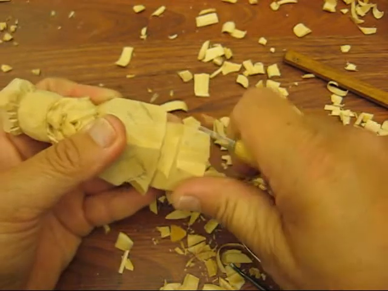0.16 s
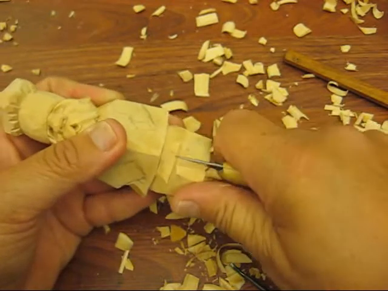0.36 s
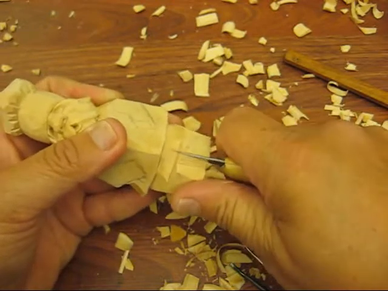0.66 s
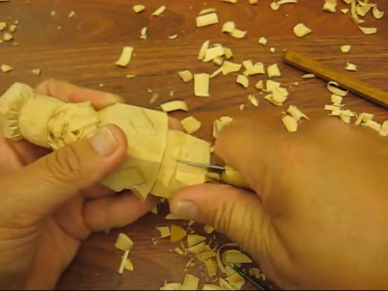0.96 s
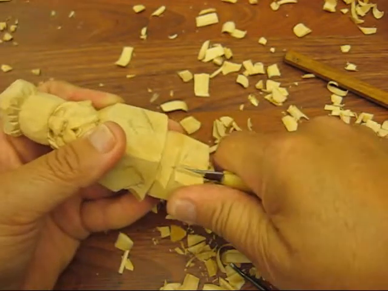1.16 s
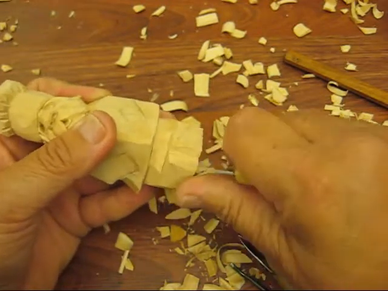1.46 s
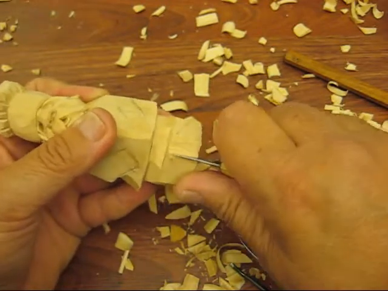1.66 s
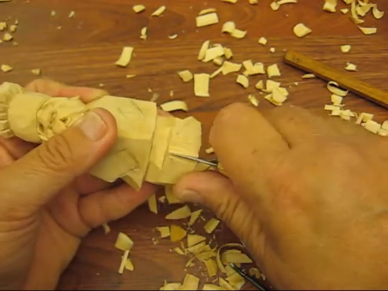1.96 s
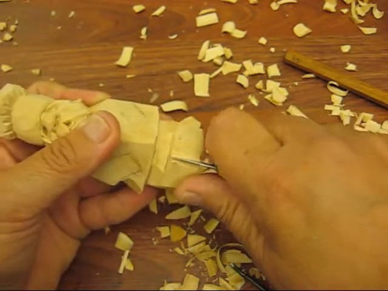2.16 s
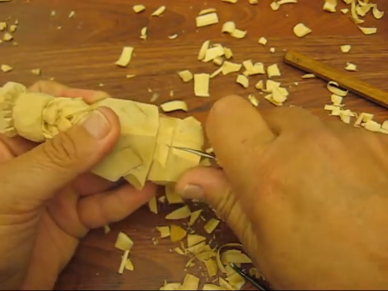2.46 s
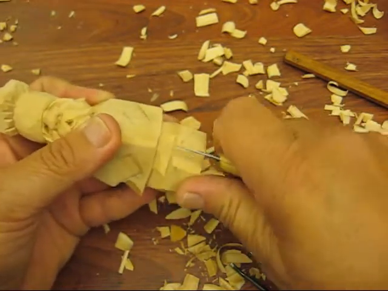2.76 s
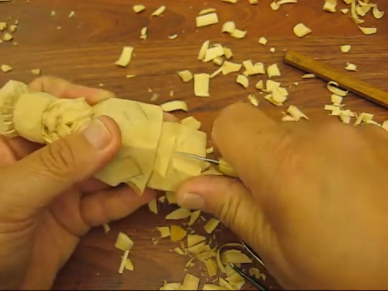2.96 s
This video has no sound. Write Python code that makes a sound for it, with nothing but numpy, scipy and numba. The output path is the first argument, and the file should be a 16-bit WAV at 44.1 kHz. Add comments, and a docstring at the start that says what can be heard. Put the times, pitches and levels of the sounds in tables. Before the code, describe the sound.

A small knife carves wood with light clicks and scrapes over a low fan hum.

```python
"""A small knife works a hand-held wooden figure over a bench; a fan hums in the quiet room throughout.
After the faint ringing tail of a blade snap, a chip breaks off at 0.9 s with a ringing crunch and the
blade snaps out of cuts, sharpest at 1.2 s. From 2 s it judders (stick-slip) and scrapes through the grain
while fingers rub the wood; three more snaps at 2.5 s, then a last rub. A small camera hears it: its gain
ducks with a low bump at the sharpest click, and it stores coarse, held samples."""
import sys
import numpy as np
from scipy import signal
from scipy.fft import rfft, irfft
from scipy.io import wavfile
from scipy.ndimage import uniform_filter1d
from numba import njit

SR = 44100
rng = np.random.default_rng(int(sys.argv[2]) if len(sys.argv) > 2 else 0)


def materialize(psi):
    """Save the field psi as 16-bit PCM at rate SR to the path in sys.argv[1].

    A 1-D psi becomes a single channel; in a 2-D psi each row is a channel.
    """
    bounded = np.clip(np.atleast_2d(psi).T, -1, 1)
    quanta = np.round(bounded * 32767).astype(np.int16)
    wavfile.write(sys.argv[1], SR, quanta)


N = 136710

# air rush spectrum: f/Hz, relative density/dB
AIR_SPECTRUM = [(25, -14.5), (75, -13.5), (140, -8.5), (200, -2.5), (260, -3.5), (350, -1), (430, -4),
                (490, -10.5), (700, -11), (1000, -10), (1250, -17), (2000, -23.5), (3500, -28.5),
                (6000, -34.5)]
# mains hum: f/Hz, rms level/dB
HUM_TONES = [(58.7, -46.5), (102, -57), (120, -51)]
# fan resonances: f/Hz, width/Hz, rms level/dB
FAN_RESONANCES = [(293.9, 10, -49.5), (353.2, 8, -46), (411.2, 4, -48), (820.8, 10, -58), (999, 14, -56.5)]
# finger rubs: t/s, length/s, start level/dB, end level/dB
RUB_STROKES = [(1.979, 0.26, -37.5, -40.5), (2.36, 0.2, -43, -39), (2.706, 0.035, -36, -38.5)]
# rub spectrum: f/Hz, relative density/dB
RUB_SPECTRUM = [(60, -18), (130, -4), (200, 0), (330, -1), (500, -12), (1000, -18), (3000, -36.5)]
# noisy tail of the opening snap (first row), then fibres tearing: t/s, length/s, start/dB, end/dB
EDGE_BURSTS = [(0.002, 0.05, -35.5, -38.5), (2.111, 0.018, -39, -38.5), (2.132, 0.02, -29, -30),
               (2.151, 0.017, -40, -40), (2.169, 0.011, -34.5, -34), (2.18, 0.058, -40.5, -46.5)]
# spectrum of those bursts: f/Hz, relative density/dB
EDGE_SPECTRUM = [(200, -8), (1000, -3), (2000, -8), (2800, -1.5), (3300, -5.5), (3850, 3.5), (4300, 0.5),
                 (4700, -3), (5600, -1), (8000, -10)]
# judder strength: t/s, knock/dB, squeak/dB, rasp/dB
JUDDER_LEVELS = [(1.977, -32, -45, -30), (2.0, -24, -29, -33), (2.025, -20, -32, -33),
                 (2.047, -19, -26, -41), (2.073, -20.5, -40, -37.5), (2.12, -23.5, -39, -36.5),
                 (2.25, -27, -43, -42), (2.33, -31, -51.5, -48), (2.46, -28.5, -53, -47)]
# rasp spectrum: f/Hz, relative density/dB
RASP_SPECTRUM = [(300, -14.5), (700, -7), (1050, 1), (1400, -9), (2200, -24), (5000, -38.5)]
# crunch spectrum: f/Hz, relative density/dB
CHIP_SPECTRUM = [(100, -12), (300, 1), (800, 0.5), (1400, -4), (2500, -0.5), (3500, -4), (5000, -1),
                 (8000, -15)]
# ring of figure and knife: f/Hz, relative level/dB, T60/s
BODY_MODES = [(157.5, -14.5, .35), (261, -12.5, 0.087), (328.6, 0.5, .21), (404, -4, 0.058),
              (561, -12, .09), (758, -7.5, .17), (904, -7, .09), (1094, -13.5, 0.13), (1845, -21, .25),
              (2005, -17, 0.34), (2410, -18.5, 0.27), (2688, -17, 0.39), (3440, -13.5, .3),
              (4597, -15, 0.16)]
# blade leaving the wood: t/s, crack/dB, crack f/Hz, splinter/dB, blade ring/dB, gain-control bump/dB
BLADE_SNAPS = [(0.008, -45, 2700, -40, -35.5, -61), (0.8778, -15, 1210, -17, -45, -44),
               (0.9278, -17, 1900, -23, -41.5, -59), (0.9458, -12, 2480, -22, -35, -55),
               (1.1917, 3, 3870, -7, -34, -13.5), (2.5075, -25, 3580, -33, -43.5, -60),
               (2.5106, -13, 4400, -24, -33, -59), (2.516, -18, 2450, -30, -42.5, -62)]
# blade tip ticks: t/s, level/dB
TIP_TICKS = [(0.784, -40.5), (1.1844, -36), (1.1963, -19), (1.206, -23), (1.355, -34.5), (2.568, -43)]
# blade ring: f/Hz, relative level/dB, T60/s
BLADE_MODES = [(1894, -8.5, .06), (2136, -2.5, 0.065), (2270, -3, .06), (2540, -1, .05), (2733, -1.5, .08),
               (2864, -9.5, .13), (3370, -6, .04), (3577, 2, .04), (5440, 0.5, .025)]
# splinter spectrum: f/Hz, relative density/dB
SPLINTER_SPECTRUM = [(100, -16.5), (500, -12), (1500, -16), (2200, -4), (3000, -4.5), (3600, 0.5),
                     (4600, -1), (5500, 2.5), (8000, -9)]


def undb(db):
    """Decibels to gain."""
    return 10 ** (np.asarray(db) / 20)


def unit_rms(x):
    """Scale to rms 1."""
    return x / np.sqrt(np.mean(x ** 2))


def since(start_s):
    """Seconds since start_s."""
    return np.arange(N) / SR - start_s


def decay(start_s, tau_s):
    """Sudden onset, exponential fall."""
    t = since(start_s)
    return (t >= 0) * np.exp(-np.abs(t) / tau_s)


def colour(x, spectrum):
    """Minimum-phase filter of unit power through the spectrum's points."""
    hz, db = np.array(spectrum, float).T
    grid_hz = np.maximum(np.arange(2049) * SR / 4096, 1)
    gain = undb(np.interp(np.log(grid_hz), np.log(hz), db))
    cepstrum = irfft(np.log(gain))
    cepstrum[1:2048] *= 2  # fold onto positive time
    cepstrum[2049:] = 0
    impulse = irfft(np.exp(rfft(cepstrum)))
    return signal.fftconvolve(x, impulse / np.linalg.norm(impulse))[:N]


def ring(start_s, modes):
    """Decaying modes struck together, random polarity."""
    t = np.maximum(since(start_s), 0)
    return sum(rng.choice([-1, 1]) * undb(db - 60 * t / t60_s) * np.sin(2 * np.pi * hz * t)
               for hz, db, t60_s in modes)


def fibres(per_s, spread_db):
    """Dense tiny fractures of uneven size, rms 1."""
    hits = rng.random(N) < per_s / SR
    signs = rng.choice([-1, 1], N)
    sizes = undb(spread_db * np.clip(rng.standard_normal(N), -2, 2))
    return unit_rms(hits * signs * sizes)


def stroke(start_s, length_s, start_db, end_db, edge_s=.0015):
    """Envelope: quick edges, sloping hold."""
    t = since(start_s)
    gate = np.clip(t / edge_s, 0, 1) * np.clip((length_s - t) / edge_s + 1, 0, 1)
    return gate * undb(start_db + (end_db - start_db) * np.clip(t / length_s, 0, 1))


def fan(air_db=-39):
    """Soft rush of air, mains hum, narrow fan resonances."""
    t = since(0)
    grid_hz = np.arange(N // 2 + 1) * SR / N
    out = undb(air_db) * unit_rms(colour(rng.standard_normal(N), AIR_SPECTRUM))
    for hz, db in HUM_TONES:
        out += undb(db) * np.sqrt(2) * np.sin(2 * np.pi * (hz * t + rng.random()))
    for hz, width_hz, db in FAN_RESONANCES:
        peak = 1 / (1 + (2 * (grid_hz - hz) / width_hz) ** 2)
        out += undb(db) * unit_rms(irfft(rfft(rng.standard_normal(N)) * peak, N))
    return out


def room(x, t60_s=.36, tail_db=-10, delay_s=.004):
    """Direct sound plus a short diffuse tail from bench and walls."""
    tail = rng.standard_normal(N) * decay(delay_s, t60_s / np.log(1000))
    return x + undb(tail_db) * signal.fftconvolve(x, tail / np.linalg.norm(tail))[:N]


def fingers():
    """Skin drags dully over the wood as the grip tightens."""
    envelope = sum(stroke(*row, edge_s=.012) for row in RUB_STROKES)
    return colour(fibres(per_s=900, spread_db=3) * envelope, RUB_SPECTRUM)


def edge_noise():
    """Tail of the opening snap; later the edge tears through fibres in short steps."""
    envelope = sum(stroke(*row) for row in EDGE_BURSTS)
    return colour(fibres(per_s=3000, spread_db=1.5) * envelope, EDGE_SPECTRUM)


def judder(start_s=1.9765, slips=18, period_s=.0238, slowing_s=.00038):
    """The blade sticks and slips ever more slowly; per slip a dull knock, a rough squeak and a rasp."""
    knock_hz, knock_width_s = 250, .0018
    squeak_hz, squeak_width_s = 1880, .0028
    times_s, knock_db, squeak_db, rasp_db = np.array(JUDDER_LEVELS).T
    waver = .07 * unit_rms(uniform_filter1d(rng.standard_normal(N), size=50))
    tone = np.sin(2 * np.pi * np.cumsum(squeak_hz * (1 + waver)) / SR)
    out, rasp = np.zeros(N), np.zeros(N)
    slip_s = start_s
    for k, detune in enumerate(1 + .08 * rng.standard_normal(slips)):
        t = since(slip_s)
        knock = np.exp(-(t / knock_width_s) ** 2 / 2) * np.cos(2 * np.pi * knock_hz * detune * t)
        squeak = np.exp(-(t / squeak_width_s) ** 2) * tone
        out += undb(np.interp(slip_s, times_s, knock_db)) * knock
        out += undb(np.interp(slip_s, times_s, squeak_db)) * squeak
        rasp += undb(np.interp(slip_s, times_s, rasp_db)) * decay(slip_s, tau_s=.004)
        slip_s += period_s + k * slowing_s
    return out + colour(rasp * rng.standard_normal(N), RASP_SPECTRUM)


def chip(start_s=.8765, ring_db=-17):
    """A chip splits off in a run of fractures and sets the figure ringing."""
    envelope = stroke(start_s, length_s=.058, start_db=-21.5, end_db=-27.5)
    crunch = colour(fibres(per_s=2200, spread_db=4) * envelope, CHIP_SPECTRUM)
    return crunch + undb(ring_db) * ring(start_s, BODY_MODES)


def snaps(crack_tau_s=.00017, splinter_tau_s=.0025, bump_hz=30):
    """The blade leaves the wood: crack, splinters, blade ring. Tip ticks: splinters only."""
    splinters, out = np.zeros(N), np.zeros(N)
    for start_s, crack_db, crack_hz, splinter_db, ring_db, bump_db in BLADE_SNAPS:
        t = since(start_s)
        splinters += undb(splinter_db) * decay(start_s, splinter_tau_s)
        out -= undb(crack_db) * np.exp(-np.abs(t) / crack_tau_s) * np.cos(2 * np.pi * crack_hz * t)
        out += undb(ring_db) * ring(start_s, BLADE_MODES)
        # low bump from the camera's gain control as it clamps on a sharp click
        out -= undb(bump_db) * decay(start_s, tau_s=.006) * np.cos(2 * np.pi * bump_hz * t)
    for start_s, db in TIP_TICKS:
        splinters += undb(db) * decay(start_s, splinter_tau_s)
    return out + colour(splinters * rng.choice([-1, 1], N), SPLINTER_SPECTRUM)


def scene():
    """Knife work in the room, over the fan; mono."""
    carving = chip() + snaps() + edge_noise() + judder() + fingers()
    return (room(carving) + fan())[None]


@njit
def duck_db(over_db, initial_db, recover_s):
    """Gain reduction: jumps to any overshoot, then relaxes."""
    relax = np.exp(-1 / (recover_s * SR))
    out, held_db = np.empty(len(over_db)), initial_db
    for i in range(len(over_db)):
        held_db = max(held_db * relax, over_db[i])
        out[i] = held_db
    return out


def record(dry):
    """Camera: low-pass, gain control, coarse held samples, top cut."""
    band_hz, top_hz, limit_db = 5300, 15200, -10.4
    hold_samples, step = 4, 1 / 128
    x = signal.sosfilt(signal.butter(4, band_hz, fs=SR, output="sos"), dry[0])
    over_db = 20 * np.log10(np.abs(x) + 1e-9) - limit_db
    x = x * undb(-duck_db(over_db, initial_db=7.0, recover_s=.29))
    coarse = np.round(x[::hold_samples] / step) * step
    held = np.repeat(coarse, hold_samples)[:N]
    return signal.sosfilt(signal.ellip(10, .2, 70, top_hz, fs=SR, output="sos"), held)[None]


dry = scene()
out = record(dry)
materialize(out)
```